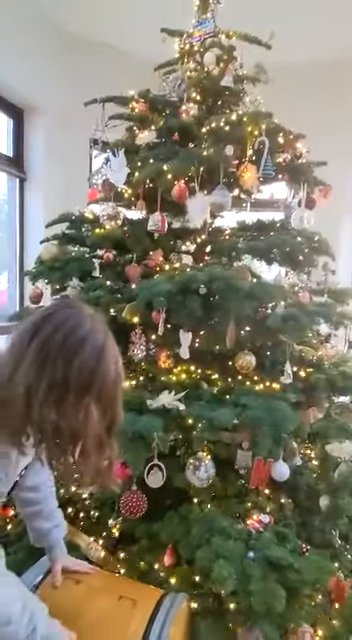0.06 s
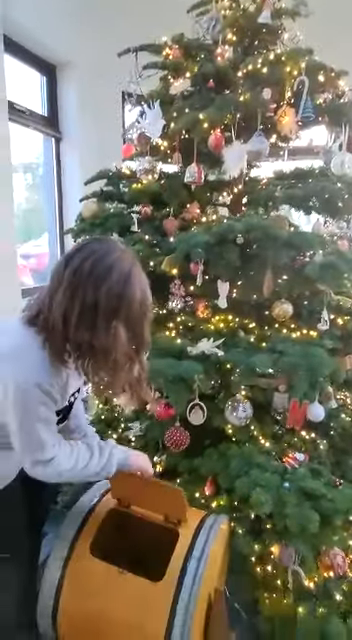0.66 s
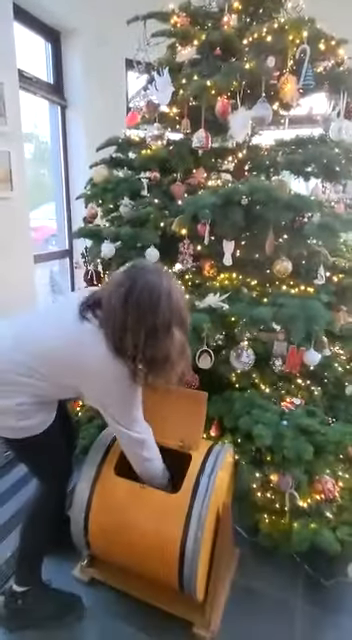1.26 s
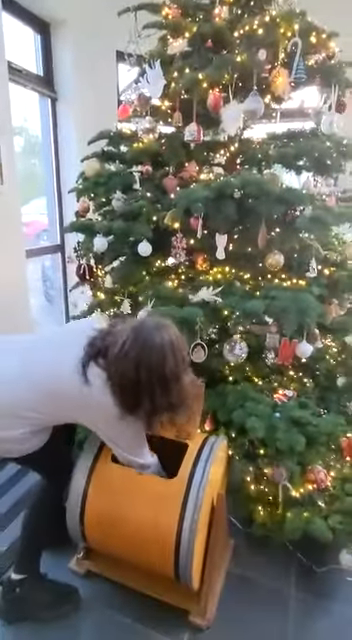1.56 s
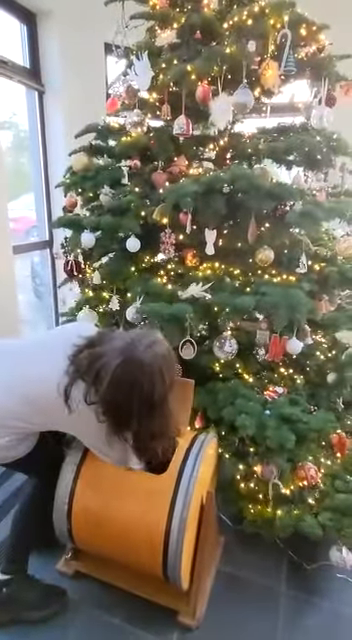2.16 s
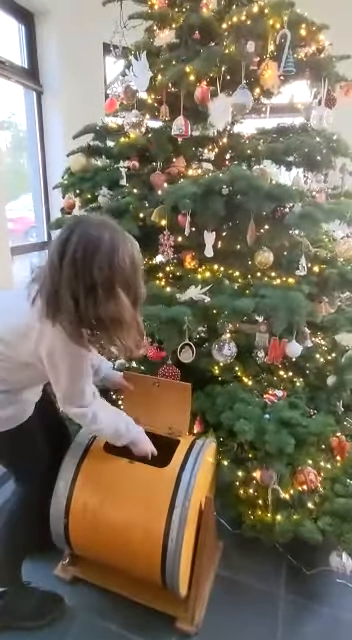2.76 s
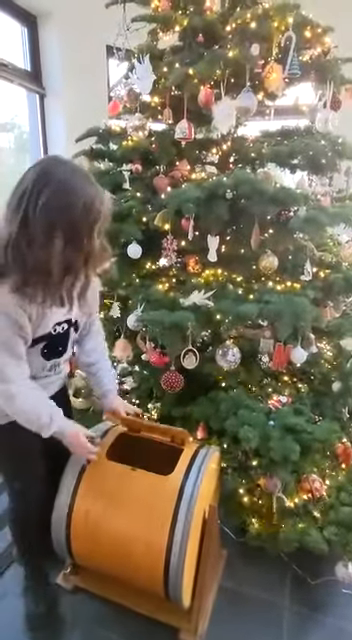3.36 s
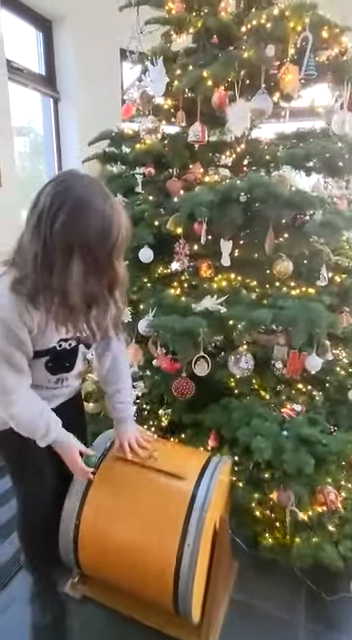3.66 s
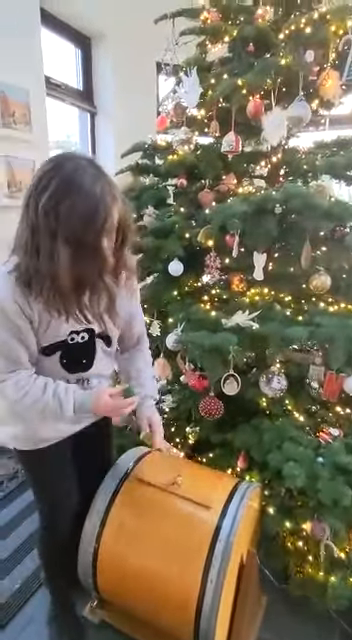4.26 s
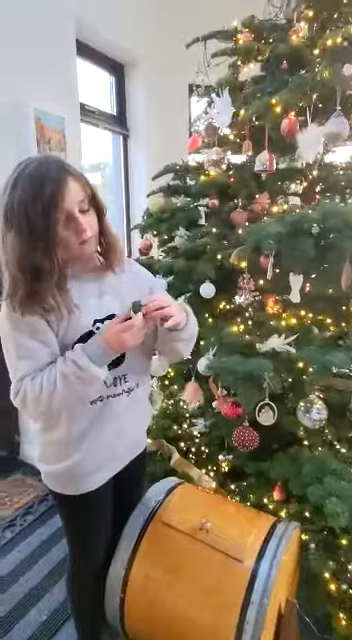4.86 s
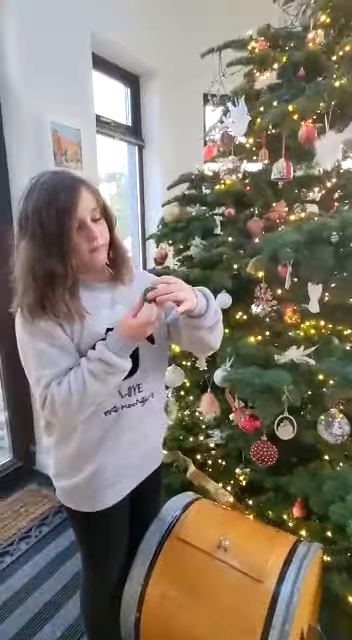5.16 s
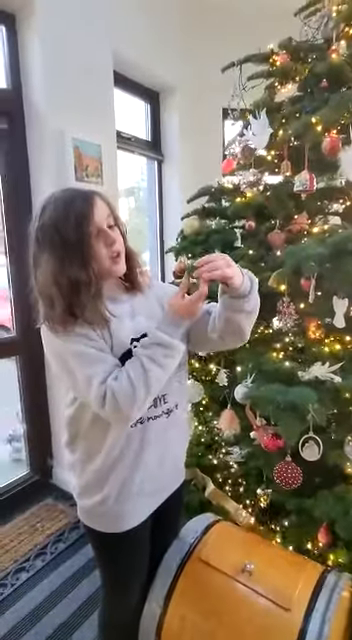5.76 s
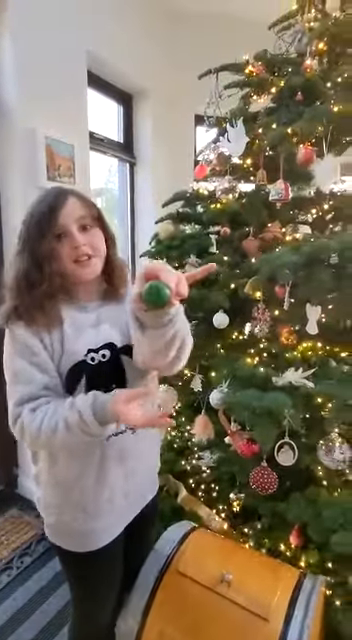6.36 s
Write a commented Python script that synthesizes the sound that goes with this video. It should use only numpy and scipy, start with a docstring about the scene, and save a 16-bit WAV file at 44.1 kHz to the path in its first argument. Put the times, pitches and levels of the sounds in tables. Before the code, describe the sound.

A faint hum hangs in an echoing, stone-floored room. At about 0.25 seconds the catch of a wooden lottery drum snaps open. The hinge gives a faint, thin, falling squeak, and the lid thumps back at 0.75 seconds. A sleeve brushes softly over the opening now and then. From 1.6 to 2.7 seconds a hand stirs the balls inside, with several clear clacks among smaller jostling. Two hollow wooden knocks ring out around 2.8 seconds, and another at 3.5. Between 3.6 and 4.1 seconds the lid is clapped shut and latched with bright steel clicks, while the drum rocks on its stand with low thumps. Two light knocks come near 5 seconds, then firmer ones at 5.4, followed by something wooden bouncing quickly to rest. A last cluster of strong hollow knocks sounds from 6.1 to 6.5 seconds.

```python
"""A wooden lottery drum in an echoing, stone-floored room with a faint hum. The catch snaps open,
the hinge squeaks and the lid thumps back. A sleeve brushes the opening and a hand stirs the clacking
balls. Hollow wooden knocks ring out, then the lid is clapped shut and latched, rocking the drum.
More knocks follow, and one of them bounces to rest."""
import sys
import numpy as np
from scipy import signal
from scipy.fft import rfft, irfft, next_fast_len
from scipy.io import wavfile
from scipy.ndimage import uniform_filter1d, map_coordinates

SR = 44100
rng = np.random.default_rng(int(sys.argv[2]) if len(sys.argv) > 2 else 0)


def generate_wav(signal):
    """Clip the signal to [-1, 1] and save it as 16-bit WAV at the path in sys.argv[1]."""
    frames = np.transpose(np.atleast_2d(signal))
    scaled = np.clip(frames, -1, 1) * 32767
    pcm = np.round(scaled).astype(np.int16)
    wavfile.write(sys.argv[1], SR, pcm)


N = 287532
CLOCK = np.arange(N) / SR  # seconds through the whole scene
T, HZ = np.arange(SR) / SR, np.fft.rfftfreq(SR, 1 / SR)  # times and frequencies of a one-second sound
HEAD = 512  # samples of space before each hit


def amp(db):
    """Turn decibels into a multiplier."""
    return 10 ** (np.asarray(db) / 20)

def unit(x):
    """Scale a signal to an average power of 1."""
    return x / np.sqrt(np.mean(x ** 2) + 1e-20)

def along(points, hz):
    """Read a smooth curve between (frequency, value) points, spaced by octaves."""
    point_hz, values = np.transpose(points)
    return np.interp(np.log(hz + 1), np.log(point_hz + 1), values)

def pan(db):
    """Make the left side db louder than the right."""
    return amp(np.array([[db], [-db]]) / 2)

def delay_left(lag_s):
    """Make a spectrum reach the left microphone lag_s later."""
    return np.exp(-2j * np.pi * HZ * np.array([[lag_s], [0]]))

def wobble(rate_hz):
    """A smooth random curve through rate_hz new values a second."""
    return map_coordinates(rng.standard_normal(int(N * rate_hz / SR) + 4), [CLOCK * rate_hz])

def lifts(resonances):
    """The boost in dB from resonances, the pitches a body favours."""
    return sum(db / (1 + (2 * (HZ - hz) / width) ** 2) for hz, width, db in resonances)

def tilt(slope, corner_hz):
    """Harder hits are brighter: add slope dB per octave above the corner."""
    return slope * np.log2(1 + (HZ / corner_hz) ** 2) / 2

def impact(db):
    """Spectrum of the most sudden hit with these levels (minimum phase)."""
    cepstrum = irfft(np.log(amp(db) + 1e-6))
    cepstrum[1:SR // 2] *= 2
    cepstrum[SR // 2 + 1:] = 0
    return np.exp(rfft(cepstrum))

def ring(modes, lag_s, attack_s):
    """Spectrum of ringing tones, each dying away by 60 dB in its fade_s."""
    tones = sum(amp(db + rng.normal(0, 1) - 60 * T / fade_s) * np.sin(2 * np.pi * hz * T)
                for hz, db, fade_s in modes)
    return rfft(tones * (1 - np.exp(-T / attack_s))) * delay_left(lag_s)

def even(x, width_hz):
    """Spectrum of x with its broad peaks and dips levelled out."""
    spectrum = rfft(x)
    power = np.abs(uniform_filter1d(np.abs(spectrum) ** 2, width_hz, axis=-1))
    return spectrum / np.sqrt(power + 1e-12)

def waveform(spectrum):
    """Turn a spectrum into a one-second sound that hits HEAD samples in."""
    return np.roll(irfft(spectrum), HEAD, axis=-1) * signal.windows.tukey(SR, HEAD / SR)

def add(track, start_s, spectrum):
    """Mix one hit into the track."""
    part = track[:, max(round(start_s * SR) - HEAD, 0):][:, :SR]
    part += waveform(spectrum)[:, :part.shape[1]]

# How alike the room sounds on the left and right: frequency_hz, likeness (1 = the same)
STEREO_LIKENESS = [(60, 0.99), (160, 0.95), (320, 0.9), (600, 0.29), (1100, 0.046), (2000, 0.1),
                   (16000, 0.038)]
def diffuse(pair, hz):
    """Sound from all around reaches two close microphones with nearly the same bass."""
    turn = np.arccos(np.clip(along(STEREO_LIKENESS, hz), -1, 1)) / 2
    mid, side = pair[0] * np.cos(turn), pair[1] * np.sin(turn)
    return np.array([mid + side, mid - side])

# How long the room's echo takes to drop by 60 dB: frequency_hz, fade_s
ROOM_ECHO = [(60, 0.53), (300, 0.71), (1000, 0.72), (3000, 0.54), (8000, 0.52), (15000, 0.24)]
def path(direct_db, lag_s, scatter=0.14, scatter_s=0.023, build_s=0.0069):
    """A hit reaches the microphones as a short crack, then as the room's echo."""
    crack = scatter * rng.standard_normal((2, SR)) * amp(-60 * T / scatter_s)
    crack[:, 0] += 1
    hz, t, bands = signal.stft(rng.standard_normal((2, SR)), SR, nperseg=256)
    fade = amp(-60 * t / along(ROOM_ECHO, hz)[:, None])
    tail = signal.istft(bands * fade, SR, nperseg=256)[1][:, :SR]
    echo = diffuse(even(tail * (1 - np.exp(-T / build_s)), width_hz=90), HZ)
    return (amp(direct_db) * even(crack, width_hz=700) + echo) * delay_left(lag_s)

def in_room(x, direct_db):
    """Add the room's echo to a lasting sound, at about the same loudness."""
    echo = waveform(path(direct_db, lag_s=0.00018))
    return signal.fftconvolve(x[None], echo / np.linalg.norm(echo[0]), axes=1)[:, HEAD:HEAD + N]

def noise(colour):
    """Noise from all around, with the given balance of bass and treble."""
    hz = np.fft.rfftfreq(N, 1 / SR)
    white = diffuse(rfft(rng.standard_normal((2, N))), hz)
    return unit(irfft(white * amp(along(colour, hz)), N))


# Tone colour (balance of bass and treble) of the quiet room: frequency_hz, level_db
AIR_COLOUR = [(20, -42), (45, -1.5), (75, -2.5), (115, 0.5), (250, -4.5), (450, -9), (850, -7.5),
              (1200, -13.5), (2200, -14), (5200, -21), (8200, -15), (10800, -27), (13500, -21),
              (16000, -23.5)]
def room_tone(air_db=-51.5, hum_hz=100, hum_db=-56):
    """Still air and a faint mains hum."""
    hum = np.sqrt(2) * np.sin(2 * np.pi * hum_hz * CLOCK)
    return amp(air_db) * noise(AIR_COLOUR) + amp(hum_db) * hum

def tick(db, hz, relative_width=0.74):
    """Hard edges meet with a short bright tick; the higher it is, the wider its band."""
    band_db = -20 * np.log10(1 + (2 * (HZ - hz) / (relative_width * hz)) ** 2)
    return impact(db - 11 + band_db) * path(direct_db=7.5, lag_s=0.00003, scatter=0.26, scatter_s=0.015)

# Tone colour of the lid's clap: frequency_hz, level_db
CLAP_COLOUR = [(30, -44), (120, 3.5), (330, 7), (800, 4), (1400, 0), (2800, 2), (4500, -0.5), (8200, -3),
               (10800, -21.5), (13500, -13), (16000, -20)]
# Ringing tones of the wooden lid and the steel catch: pitch_hz, level_db, fade_s
LID_TONES = [(223, -45, .7), (243, -44, .5), (336, -43, .5), (480, -45, .4), (545, -48, .45),
             (805, -42, .45), (1130, -48, .35), (1350, -53, .7), (1776, -55, .5), (2747, -54, .35),
             (2881, -53, .4)]
STEEL_TONES = [(2815, -20, .44), (4200, -15, .25), (4298, -17, .25), (5644, -8, .15), (6098, -3, .1),
               (7736, -15, .2)]
# Snaps of the lid and catch:
# start_s, level_db, brightness_db_per_octave, lid_ring_db, steel_ring_db, tick_db, tick_hz, pan_db
LID_SNAPS = [(.249, 12, -6.5, -1.5, -62, -20, 2970, -6), (0.2571, 17.5, -3.5, 2.5, -42, 13.5, 3100, 2.5),
             (0.2582, 5, -1, -1, -45, 15, 7980, 2), (3.643, 18.5, 2, 1, -12, 20.5, 6250, 6),
             (3.6574, 15, -5, 2.5, -13, 17, 5930, 12.5), (3.688, 18.5, -3, -28, -25, 14, 6000, 3.5),
             (3.917, 12.5, -8.5, 3, -63, -15, 3000, -6), (3.9364, 22, 1.06, -2, -25, 16.5, 7040, 5.5),
             (3.954, 3, 4, -4, -34, -9, 2100, -4)]
def lid_snaps(catch_pan_db=-5.5):
    """The lid claps on its rim and rings; the steel catch ticks and shakes."""
    out = np.zeros((2, N))
    for start_s, db, bright, lid_db, steel_db, tick_db, tick_hz, pan_db in LID_SNAPS:
        clap = amp(db - 2.5) * impact(along(CLAP_COLOUR, HZ) + tilt(bright, corner_hz=1500))
        lid = amp(lid_db - 6) * ring(LID_TONES, lag_s=0.00011, attack_s=0.011)
        steel = amp(steel_db - 8) * ring(STEEL_TONES, lag_s=0.00002, attack_s=0.00026)
        catch = tick(tick_db + 1, tick_hz, relative_width=0.41) * pan(catch_pan_db)
        room = path(direct_db=-8, lag_s=0.00002, scatter=0.31, scatter_s=0.034)
        add(out, start_s, (clap * (room + lid) + steel + catch) * pan(pan_db))
    return out

# Tone colour of a thump: frequency_hz, level_db
THUMP_COLOUR = [(25, -32), (36, -27), (48, -10.5), (110, -1.5), (175, -10), (260, -0.5), (350, -13.5),
                (500, -20.5), (1000, -24), (4000, -51)]
# Pitches the whole drum favours: pitch_hz, width_hz, boost_db
DRUM_RESONANCES = [(49.4, 6.4, 9.4), (79, 10, 7.1), (116, 14.6, 6.1), (244, 7, 2.3), (250.5, 30, 4.7),
                   (295, 14, 2.7)]
# The drum rocking on its stand: start_s, level_db, drum_boom_db, floor_rumble_db
DRUM_THUMPS = [(.262, 16, 9, 1), (0.743, 25, 6.5, -21), (0.779, 22, 7, -8), (3.648, 29, -7.5, -6),
               (3.685, 22, 6.5, 13), (3.79, 24, -1, 17), (3.917, 31.5, -16, 3), (3.956, 23, 12, 12),
               (4.078, 26.5, 1.5, -11)]
def drum_thumps(boom_hz=112, rumble_hz=50):
    """Soft, heavy pushes make the drum and its stand boom."""
    out = np.zeros((2, N))
    drum = along(THUMP_COLOUR, HZ) + lifts(DRUM_RESONANCES)
    for start_s, db, boom_db, rumble_db in DRUM_THUMPS:
        weight = lifts([(boom_hz, 75, boom_db), (rumble_hz, 28, rumble_db)])
        add(out, start_s, amp(db) * impact(drum + weight) * path(direct_db=-6, lag_s=0.00026))
    return out * pan(0.75)

# The course of the hinge's squeak: time_s, pitch_hz, level_db
HINGE_SQUEAK = [(.4, 2850, -61), (.49, 2856, -54.5), (.59, 2760, -53), (.64, 2680, -51), (.68, 2620, -73)]
def hinge(slip_rate_hz=420, roughness=0.055):
    """The hinge slips unevenly as the lid opens, giving a thin, rough, falling squeak."""
    time_s, hz, db = np.transpose(HINGE_SQUEAK)
    pitch = np.interp(CLOCK, time_s, hz) * (1 + roughness * wobble(slip_rate_hz))
    squeak = np.sqrt(2) * np.sin(2 * np.pi * np.cumsum(pitch) / SR)
    loudness = amp(np.interp(CLOCK, time_s, db, left=-120, right=-120))
    return in_room(squeak * loudness, direct_db=0)

def strokes(rows, rise_s, fall_s):
    """Each hand movement swells, holds and dies away; rise_s and fall_s each cover 20 dB."""
    loudness = np.zeros(N)
    for start_s, length_s, db in rows:
        before_s = np.maximum(start_s - CLOCK, 0)
        after_s = np.maximum(CLOCK - start_s - length_s, 0)
        loudness += amp(db - 20 * before_s / rise_s - 20 * after_s / fall_s)
    return loudness

# Tone colour of rubbing cloth: frequency_hz, level_db
CLOTH_COLOUR = [(200, 2.5), (700, 4.5), (1500, -2.5), (4000, -3), (8000, 0), (10800, -10.5), (14000, -8),
                (16000, -10)]
# The sleeve touching the rim of the opening: start_s, length_s, level_db
SLEEVE_BRUSHES = [(.675, 0.13, -46), (1.05, 0.06, -54), (1.175, .01, -48.5), (1.65, 0.17, -57.5),
                  (2.03, .02, -60), (3.0, 0.28, -51), (3.08, 0.037, -52.5)]
def sleeve(snag_db=2, snag_rate_hz=90):
    """Cloth brushes over the wood in small, uneven snags."""
    snags = amp(2.5 + snag_db * wobble(snag_rate_hz))
    return snags * strokes(SLEEVE_BRUSHES, rise_s=0.096, fall_s=0.13) * noise(CLOTH_COLOUR)

# Tone colour of one ball hitting another: frequency_hz, level_db
BALL_COLOUR = [(50, -30), (200, 2), (450, 3.5), (900, 3.5), (1400, -6.5), (2500, -15), (5000, -31),
               (11000, -55), (16000, -45)]
# The clearest clacks: start_s, level_db, brightness_db_per_octave
BALL_CLACKS = [(1.6294, 13, -7.5), (1.702, 12.5, -6.5), (1.7444, 14, 1.5), (1.82, 5.5, 7),
               (2.0057, 5.5, -1.5), (2.1336, 8, -12), (2.2685, 9.5, 2.5), (2.3356, 12.5, -4)]
# The hand digging through the heap: start_s, length_s, level_db
HAND_STIRS = [(1.64, .07, -32.5), (2.02, 0.22, -37), (2.335, 0.035, -33.5), (2.56, .14, -44)]
def balls(hits_per_s=80, stir_db=-7):
    """Stirred balls bump together: a few clear clacks and many small ones."""
    out, ball = np.zeros((2, N)), along(BALL_COLOUR, HZ)
    for start_s, db, bright in BALL_CLACKS:
        clack = amp(db - 5) * impact(ball + tilt(bright, corner_hz=970))
        add(out, start_s, clack * path(direct_db=-9, lag_s=0.00012, build_s=0.0017))
    hits = (rng.random(N) < hits_per_s / SR) * amp(rng.normal(0, 2.4, N))
    jostle = unit(signal.fftconvolve(hits, irfft(impact(ball)))[:N])
    jostle *= strokes(HAND_STIRS, rise_s=0.02, fall_s=0.13)
    return out + amp(stir_db) * in_room(jostle, direct_db=-2)

# Tone colour of struck wood: frequency_hz, level_db
WOOD_COLOUR = [(30, -54), (60, -23), (120, -8.5), (220, -0.5), (380, 5), (600, -5), (1000, -8.5),
               (1450, -12.5), (2600, -16), (4200, -27.5), (8300, -31.5), (10800, -48.5), (14000, -40.5),
               (16000, -46)]
# Pitches the drum's slats boost or weaken: pitch_hz, width_hz, boost_db
SLAT_RESONANCES = [(429, 53, -5), (507, 63, -0.5), (790, 170, 3.5), (1120, 31, 3.5), (1440, 170, -6.5),
                   (1634, 156, 3.5), (2030, 200, -1.5), (2450, 50, 3), (3030, 87, 0), (3250, 120, 5),
                   (3570, 93, 4.5), (4120, 620, 7.5)]
# Ringing tones of the planks: pitch_hz, level_db, fade_s
PLANK_TONES = [(431, -54, .5), (560, -54, .5), (764, -55, .5), (945, -53, .4), (1093, -51, .45),
               (1152, -48, .45), (1529, -55, .45), (1626, -56, .45), (1690, -55, .35), (2444, -54, .4),
               (2686, -54, .45)]
def strike(db, bright, spot_hz, spot_ring_db, spot_width_hz=150, spot_db=6, spot_fade_s=0.26):
    """A blow cracks on the slats and rings the planks; the struck spot adds its own pitch."""
    wood = along(WOOD_COLOUR, HZ) + lifts(SLAT_RESONANCES)
    spot = lifts([(spot_hz, spot_width_hz, spot_db)])
    bass = (1 - np.exp(-(HZ / 130) ** 2)) / (1 + (HZ / 260) ** 6)  # where whole panels bend
    contact = tilt(bright, corner_hz=710) - (2.06 * bright + 5.1) * bass  # softer is duller and heavier
    room = path(direct_db=-3, lag_s=0.00046, build_s=0.0042)
    planks = amp(-1.5) * ring(PLANK_TONES, lag_s=0.00043, attack_s=0.00091)
    spot_ring = ring([(spot_hz, spot_ring_db, spot_fade_s)], lag_s=0.00024, attack_s=0.00091)
    return amp(db - 2.5) * impact(wood + spot + contact) * (room + planks + spot_ring)

# Ringing tones of the hollow body: pitch_hz, level_db, fade_s
HOLLOW_TONES = [(319, 0, .6), (308, -12, .3), (334, -8, .22)]
# Hollow wooden knocks:
# start_s, touch_db, weight_db, brightness_db_per_octave, hollow_ring_db, spot_hz, tick_db, tick_hz
WOOD_KNOCKS = [(2.772, 28.5, 31.5, -1, -12, 1140, 15, 2630), (2.8416, 29, 22.5, -2, -17.5, 1200, 9.5, 2700),
               (3.463, 28.5, 32.5, -1.56, -39, 922, 6.5, 3950), (4.9216, 9, 17.5, -1.6, -21, 660, -9, 9300),
               (5.0010, 0, 11.5, -8.5, -23.5, 636, -13, 4000),
               (5.3778, 23.5, 28, -2, -48, 1217, -3.5, 8300),
               (5.4636, 20.5, 23.5, -0.5, -38, 710, -7, 3000),
               (6.1472, 31.5, 33.5, 0, -14, 1126, 17.5, 2700),
               (6.3429, 29, 29.5, 1.5, -10, 1137, -0.5, 6500),
               (6.3560, 19, 25.5, -1.5, -12.5, 547, 4, 2500), (6.4710, 25, 23.5, -0.55, -24, 1183, 9, 2500)]
def knocks(edge_hz=1660, weight_delay_s=0.0026):
    """An edge touches with a tick; then the full weight lands and sets the hollow body humming."""
    out = np.zeros((2, N))
    for start_s, touch_db, weight_db, bright, hollow_db, spot_hz, tick_db, tick_hz in WOOD_KNOCKS:
        body = amp(hollow_db - 3) * ring(HOLLOW_TONES, lag_s=0.00023, attack_s=0.0012)
        touch = strike(touch_db, bright, edge_hz, spot_ring_db=-52)
        add(out, start_s, touch + tick(tick_db, tick_hz) * pan(-5))
        weight = strike(weight_db, bright, spot_hz, spot_ring_db=-45.5)
        add(out, start_s + weight_delay_s, weight + body * pan(0.9))
    return out

def rattle(start_s=5.517, bounces=6, first_hop_s=0.032, shrink=0.68, first_db=26, loss_db=5.5):
    """Something wooden bounces to rest, each hop shorter and each landing weaker."""
    out, time_s = np.zeros((2, N)), start_s
    for k in range(bounces):
        add(out, time_s, strike(first_db - loss_db * k, bright=-4, spot_hz=545, spot_ring_db=-54))
        time_s += first_hop_s * shrink ** k
    return out

def scene():
    """All the sounds added together, in the order they are first heard."""
    return room_tone() + lid_snaps() + drum_thumps() + hinge() + sleeve() + balls() + knocks() + rattle()

# How much louder the left microphone is than the right: frequency_hz, difference_db
MIC_BALANCE = [(60, -0.5), (300, 0), (1500, 0), (4500, -3), (8000, -8), (13000, 1.5)]
def record(dry, top_hz=16100):
    """Two slightly unequal microphones; peaks past full scale and the highest treble are cut off."""
    size = next_fast_len(N + SR // 2)
    hz = np.fft.rfftfreq(size, 1 / SR)
    balance = amp(along(MIC_BALANCE, hz) * np.array([[1], [-1]]) / 2)
    clipped = np.clip(irfft(rfft(dry, size) * balance, size), -1, 1)
    return irfft(rfft(clipped) * (hz < top_hz), size)[:, :N]


dry = scene()
out = record(dry)
generate_wav(out)
```